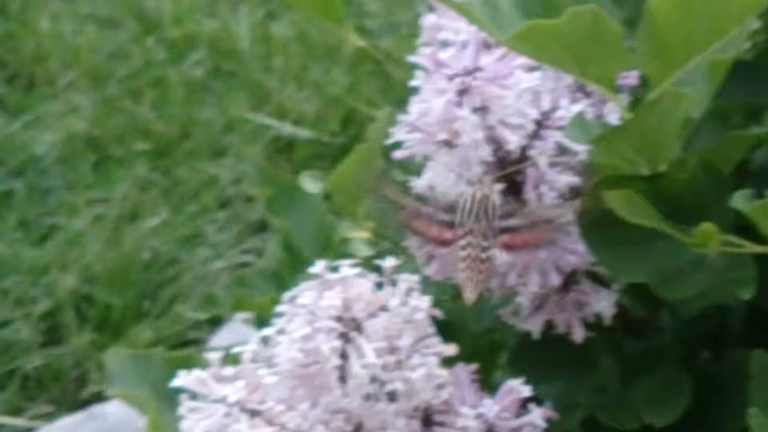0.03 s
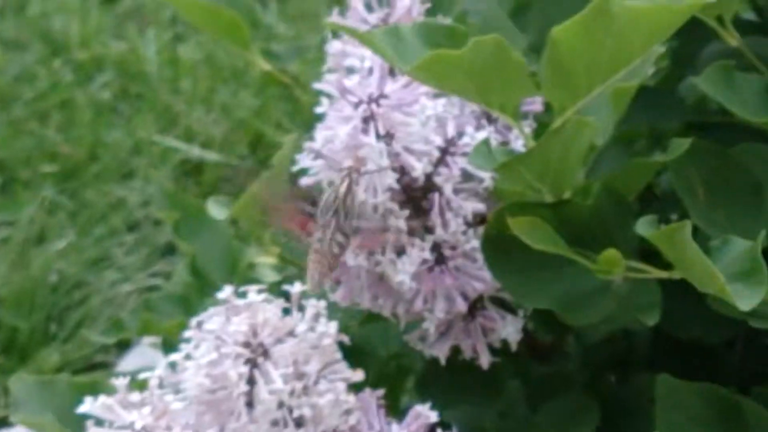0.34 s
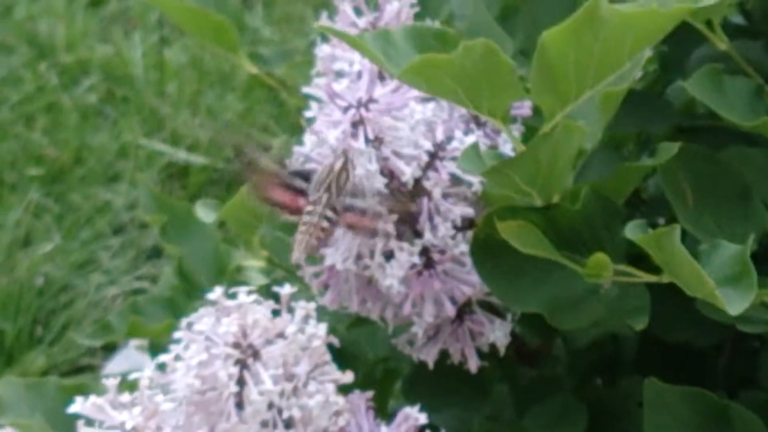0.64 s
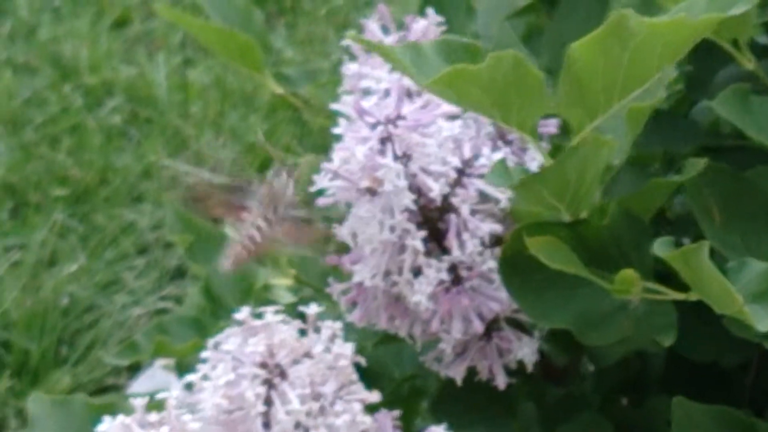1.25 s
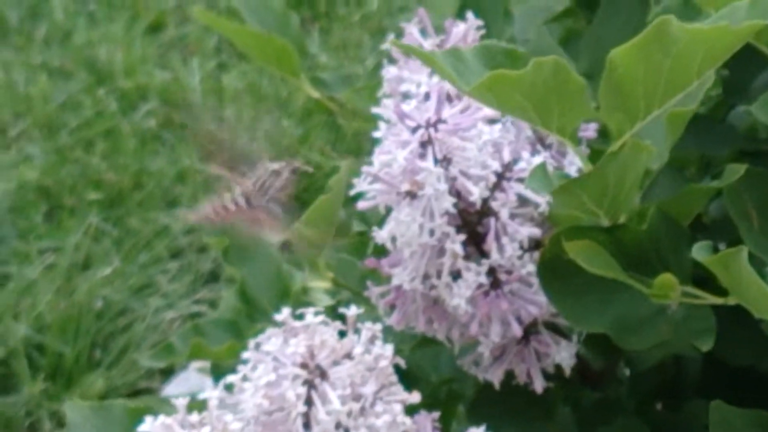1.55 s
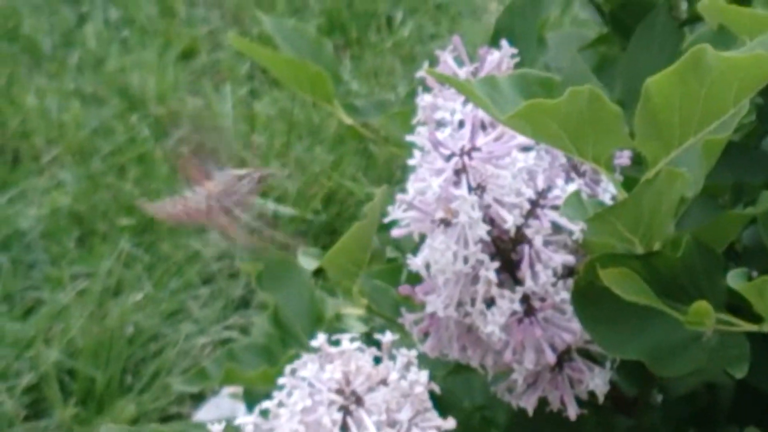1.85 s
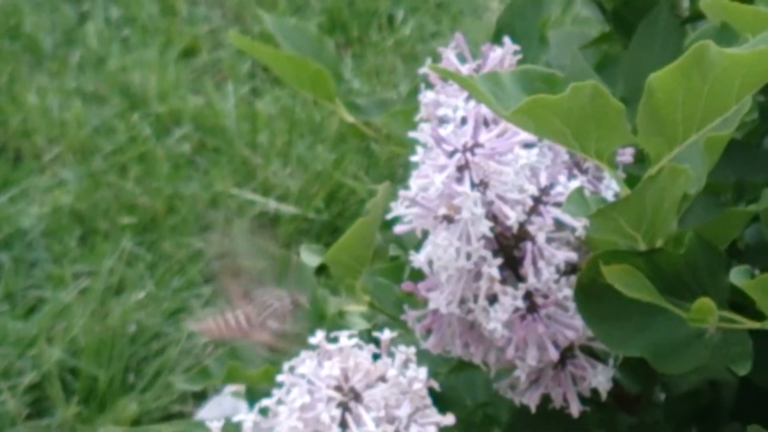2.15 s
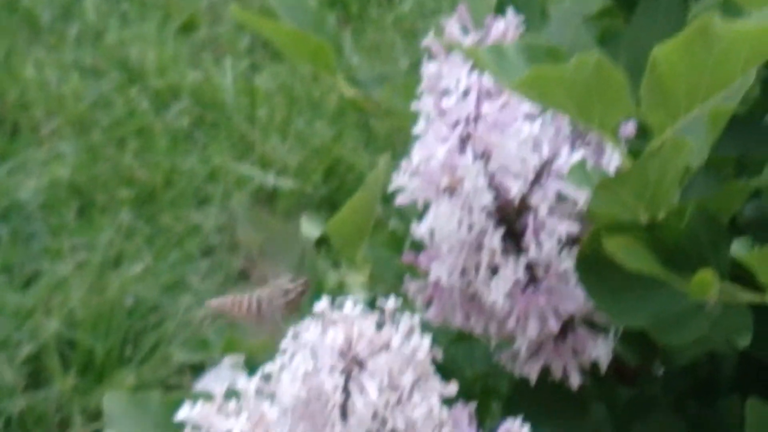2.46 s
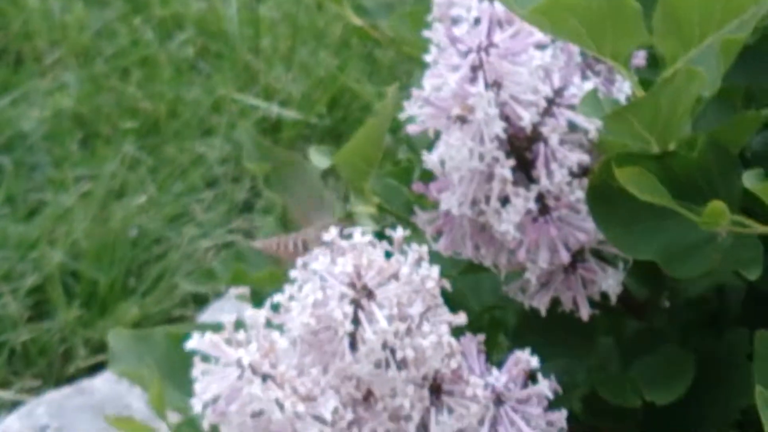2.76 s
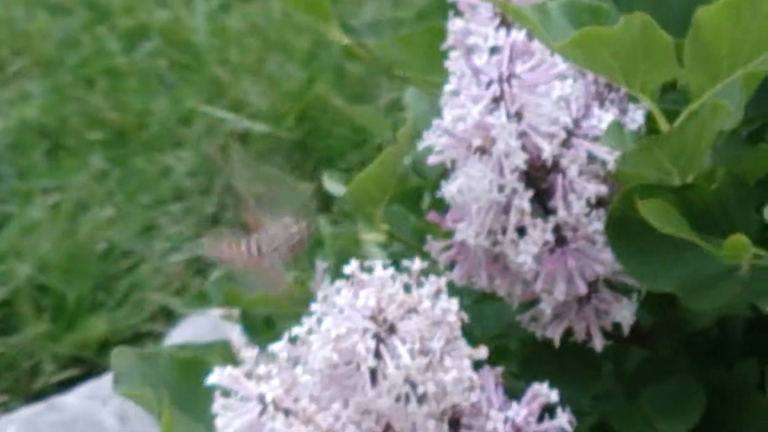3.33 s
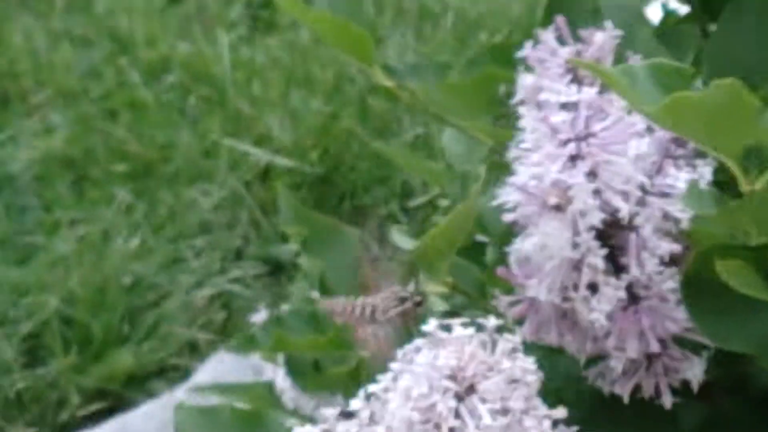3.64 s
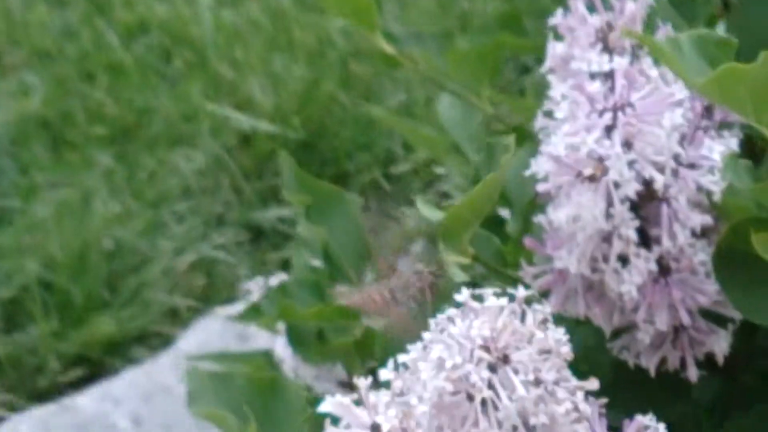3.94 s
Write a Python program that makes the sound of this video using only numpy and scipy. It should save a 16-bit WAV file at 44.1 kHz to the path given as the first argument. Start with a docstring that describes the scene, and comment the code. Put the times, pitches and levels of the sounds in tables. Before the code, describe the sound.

A distant engine idles low and steady outdoors, with a wash of traffic behind it. Early on a faint bird pips and whistles downward; later come small handling ticks and two low bumps close to the microphone.

```python
"""A big engine idles some way off to the right of a garden, its uneven firing giving low tones and rumble, and
its fan a broad wash of noise; a bird gives a few pips and one falling whistle, echoed by a wall. The
microphones are on a hand-held camera that starts a moment in. They hiss faintly and catch a puff of air; close
up, the housing ticks under the fingers and is bumped twice."""
import sys
import numpy as np
from scipy import signal
from scipy.fft import rfft, irfft, next_fast_len
from scipy.io import wavfile
from scipy.ndimage import uniform_filter1d, map_coordinates

SR = 44100
rng = np.random.default_rng(int(sys.argv[2]) if len(sys.argv) > 2 else 0)


def generate_wav(signal):
    """Clip the signal to [-1, 1] and save it as 16-bit WAV at the path in sys.argv[1]."""
    frames = np.transpose(np.atleast_2d(signal))
    scaled = np.clip(frames, -1, 1) * 32767
    pcm = np.round(scaled).astype(np.int16)
    wavfile.write(sys.argv[1], SR, pcm)


N = 176400


def amp(db):
    """Decibels to gain."""
    return 10 ** (np.asarray(db) / 20)


def unit(x):
    """Scale to rms 1."""
    return x / np.sqrt(np.mean(x ** 2) + 1e-20)


def clock():
    """Time of each sample in seconds."""
    return np.arange(N) / SR


def along(points, hz):
    """Read (frequency, value) points at hz, on a log frequency axis."""
    freqs, values = np.transpose(points)
    return np.interp(np.log(hz + 1), np.log(freqs + 1), values)


def curves(rows):
    """One value per sample for each column after the time."""
    times, *columns = np.transpose(rows)
    return [np.interp(clock(), times, column) for column in columns]


def wobble(rate):
    """A smooth random curve, rate knots a second."""
    return map_coordinates(rng.standard_normal(int(N * rate / SR) + 4), [clock() * rate])


def dying(start, t60):
    """A decay that begins at start and falls 60 dB in t60 seconds."""
    age = clock() - start
    return (age >= 0) * np.exp(-np.log(1000) * np.abs(age) / t60)


def filtered(x, response):
    """Filter x by a gain given as a function of frequency."""
    size = next_fast_len(N + SR // 2)
    return irfft(rfft(x, size) * response(np.fft.rfftfreq(size, 1 / SR)), size)[..., :N]


def noise(spectrum, correlation=np.zeros_like):
    """Coloured stereo noise of rms 1; the left-right correlation is a function of frequency."""
    def mid_side_gains(hz):
        angle = np.arccos(np.clip(correlation(hz), -1, 1)) / 2
        return amp(along(spectrum, hz)) * [np.cos(angle), np.sin(angle)]
    mid, side = filtered(rng.standard_normal((2, N)), mid_side_gains)
    return unit(np.array([mid + side, mid - side]))


def patchy(x, depth_db):
    """Let small regions of time and pitch swell and fade at random."""
    spectra = signal.stft(x, nperseg=1024)[2]
    patches = uniform_filter1d(rng.standard_normal(spectra.shape[1:]), size=5, axis=0)
    patches = uniform_filter1d(patches, size=7, axis=1)
    return signal.istft(spectra * amp(depth_db * unit(patches)), nperseg=1024)[1][:, :N]


def pan(db):
    """Left and right gains for a level difference, left minus right."""
    return amp(np.array([[.5], [-.5]]) * db)


def microphone_hiss():
    """The microphones' own faint noise, independent on each side."""
    # hiss spectrum (frequency [Hz], relative density [dB])
    spectrum = [(2000, -12.5), (4500, -3.5), (6300, -3.5), (8000, 1.5), (9500, -4), (12000, -11),
                (15500, -12)]
    # hiss loudness (time [s], level [dB])
    levels = [(.4, -75), (1.3, -73), (1.8, -72.5), (1.97, -71.5), (2.2, -72), (2.7, -72.5), (3.2, -72),
              (3.45, -71), (4, -72)]
    return pan(.8) * amp(curves(levels)[0]) * noise(spectrum)


def fan_wash():
    """Noise from the engine's fan, mostly to the right, drifting in patches."""
    # fan wash spectrum (frequency [Hz], relative density [dB])
    spectrum = [(150, -34), (250, -4), (326, -6.5), (400, -5.5), (490, -6), (660, -5), (770, -2.5),
                (860, -2), (980, -3), (1100, -1), (1230, -6.5), (1500, -10), (1950, -16), (2600, -16.5),
                (3170, -21), (6000, -30.5), (7800, -65)]
    # fan wash loudness (time [s], level [dB])
    levels = [(.4, -55.5), (1.05, -53.5), (1.45, -54.5), (1.6, -53.5), (1.64, -57.5), (1.78, -58),
              (2.0, -56.5), (2.2, -57.5), (2.6, -57.5), (3.0, -57), (3.5, -56.8), (3.95, -55)]
    # balance at the microphones (frequency [Hz], left minus right [dB])
    balance = [(60, -2), (99, 5), (160, 8), (270, 1.5), (450, -5.5), (740, -3), (1220, -7), (2010, -6),
               (3330, -1), (5500, -6.5), (9080, -5), (15000, -1.0)]
    # likeness of the two sides (frequency [Hz], correlation [-1 to 1])
    correlation = [(250, 0.91), (500, 0.82), (900, 0.51), (1300, -0.13), (2500, -0.083), (6000, -0.16)]
    wash = noise(spectrum, lambda hz: along(correlation, hz))
    wash = unit(filtered(wash, lambda hz: pan(along(balance, hz))))
    level_db = curves(levels)[0] + .42 * wobble(14)
    return amp(level_db) * patchy(wash, depth_db=1.32)


def bright_rush():
    """A faint rush, brighter than the fan's wash, that stops abruptly."""
    # rush spectrum (frequency [Hz], relative density [dB])
    spectrum = [(900, -34), (1800, -7), (2800, -5), (4500, -9), (7000, -13), (12000, -25)]
    stop_s, fade_s = 1.64, .054
    fade = np.clip((stop_s - clock()) / fade_s, 0, 1)
    return pan(-.38) * amp(-72) * fade * noise(spectrum)


def air_puff():
    """A light puff of air on the microphones: one swell of very low buffeting."""
    # buffeting spectrum (frequency [Hz], relative density [dB])
    spectrum = [(1, -15), (4, 6.5), (8, -6), (20, -17), (60, -26), (150, -49), (400, -60), (1500, -120)]
    peak_s, width_s = 1.17, .19
    swell = np.exp(-((clock() - peak_s) / width_s) ** 2)
    return amp(-43) * swell * noise(spectrum)


def finger_ticks():
    """Fingers draw tiny cracks from the plastic housing by the microphones, each with a short ring."""
    # ticks (time [s], level [dB], ring against crack before its trim [dB])
    ticks = [(2.8896, -62, -10), (2.9268, -60, -10), (3.002, -54, -3), (3.0744, -56, -8), (3.079, -63, -6),
             (3.1279, -56, -1), (3.6512, -57.5, -12), (3.6874, -61, -6), (3.838, -61, -7),
             (3.952, -57.5, -13)]
    # crack spectrum (frequency [Hz], relative density [dB])
    spectrum = [(1500, -16), (4000, -3), (6000, 1), (8000, 7), (11000, -4.5), (15000, -10.5)]
    ring_hz, half_width_hz, ring_trim_db = 3900, 750, -1.5
    crack = noise(spectrum)
    white = rng.standard_normal((2, N))
    ring = unit(filtered(white, lambda hz: 1 / (1 + ((hz - ring_hz) / half_width_hz) ** 2)))
    out = np.zeros((2, N))
    for start, db, ring_db in ticks:
        ringing = amp(ring_db + ring_trim_db) * ring * dying(start, t60=.035)
        out += amp(db) * (crack * dying(start, t60=.018) + ringing)
    return out


def camera_bumps():
    """A soft knock, then the camera body sways and quickly settles."""
    # bumps (time [s], sway rate [Hz], sway gain [dB], knock peak [dB], left minus right [dB])
    bumps = [(3.5263, 86, -30.5, -76, 6.5), (3.9818, 80, -25, -31, 18.5)]
    sway_rise_s, knock_lead_s, knock_width_s = .0012, .0008, .0005
    out = np.zeros((2, N))
    for start, hz, sway_db, knock_db, pan_db in bumps:
        age = clock() - start
        onset = 1 - np.exp(-np.abs(age) / sway_rise_s)
        sway = -amp(sway_db) * np.sin(2 * np.pi * hz * age) * onset * dying(start, t60=.053)
        knock = amp(knock_db) * np.exp(-((age + knock_lead_s) / knock_width_s) ** 2)
        out += pan(pan_db) * (sway + knock)
    return out


def bird_tone(hz, rough_rad):
    """A nearly pure tone, roughened by flutter in phase and level."""
    phase = 2 * np.pi * np.cumsum(hz) / SR + rough_rad * wobble(350)
    return np.sqrt(2) * np.sin(phase) * amp(2.5 * wobble(90))


def bird():
    """One falling whistle and a few short gliding pips."""
    # falling whistle (time [s], pitch [Hz], level [dB])
    whistle = [(.555, 4060, -75), (.58, 4020, -61.5), (.625, 3860, -62), (.66, 3560, -61.5),
               (.715, 3150, -59.5), (.752, 2480, -61), (.78, 2330, -70)]
    # pips (start [s], length [s], first pitch [Hz], last pitch [Hz], level [dB])
    pips = [(.402, .04, 3120, 3080, -65), (.43, .02, 3800, 3900, -69), (.462, .032, 3270, 3220, -62.5),
            (.858, .04, 3000, 2450, -66), (2.62, .05, 2500, 2650, -75), (3.085, .045, 2350, 2600, -69),
            (3.715, .06, 2400, 2250, -71)]
    t = clock()
    whistle_hz, whistle_db = curves(whistle)
    whistling = (t > whistle[0][0]) * (t < whistle[-1][0])
    song = bird_tone(whistle_hz, rough_rad=.35) * amp(whistle_db) * whistling
    for start, length, first_hz, last_hz, db in pips:
        progress = np.clip((t - start) / length, 0, 1)
        hz = first_hz + (last_hz - first_hz) * progress
        song += amp(db) * np.sin(np.pi * progress) * bird_tone(hz, rough_rad=.6)
    return song


def garden(song):
    """The song reaches the microphones directly, off a wall and as the garden's scatter."""
    echo_s, echo_db, scatter_db = .145, -16, -7
    tail = rng.standard_normal((2, N)) * dying(0, t60=.6)
    scatter = signal.fftconvolve(song[None], tail / np.linalg.norm(tail[0]), axes=1)[:, :N]
    direct = np.array([song, np.roll(song, shift=2)])  # reaches the left microphone first
    echo = np.roll(direct, round(echo_s * SR), axis=1)
    return direct + amp(echo_db) * echo + amp(scatter_db) * scatter


def engine():
    """Some way off to the right, uneven firing gives tones on multiples of the cycle rate, over a rumble."""
    # idle speed (time [s], four-stroke cycle rate [Hz])
    speed = [(.42, 6.76), (.8, 6.79), (1.2, 6.87), (1.85, 6.83), (2.3, 6.96), (2.5, 6.92), (2.95, 6.62),
             (3.4, 6.58), (3.95, 6.6)]
    # swell of the whole engine (time [s], gain [dB])
    effort = [(.4, 0), (.9, 0), (1.15, 1), (1.45, 1.5), (1.8, -1.5), (2.2, -1), (2.5, -3), (2.95, 0),
              (3.3, -1), (3.9, 1)]
    # exhaust tones (multiple of the cycle rate, rms before the swell [dB], left minus right [dB])
    exhaust = [(4, -55, -8.5), (8, -57.5, -2), (11, -57, -1.5), (13, -63.5, -6), (15, -59, -8),
               (16, -54, -3), (20, -75, -1), (27, -65.5, 1), (28, -66.5, -3), (32, -72.5, -5.5),
               (36, -77.5, -1.5), (38, -71, -5)]
    # rumble spectrum (frequency [Hz], relative density [dB])
    rumble = [(10, 1), (25, -17.5), (45, 5), (80, 0), (115, 2.5), (140, 1), (200, -5.5), (260, -11.5),
              (330, -20.5), (450, -61)]
    waver_db, spread_rad, drift_rad = 1.33, .19, .073
    cycle_phase = 2 * np.pi * np.cumsum(curves(speed)[0]) / SR
    out = pan(-7) * amp(-56.5) * noise(rumble, correlation=np.ones_like)
    for multiple, db, pan_db in exhaust:
        offset = rng.uniform(0, 2 * np.pi) + spread_rad * rng.standard_normal((2, 1))  # one per side
        phase = multiple * cycle_phase + offset + drift_rad * wobble(5)
        out += pan(pan_db) * np.sqrt(2) * amp(db + waver_db * wobble(5.9)) * np.sin(phase)
    return amp(curves(effort)[0]) * out


def scene():
    """The garden and the handling noise, together at the microphones."""
    hiss = microphone_hiss()
    outdoors = engine() + fan_wash() + bright_rush() + air_puff() + garden(bird())
    return hiss + outdoors + finger_ticks() + camera_bumps()


def record(dry):
    """Silence until the camera starts; nothing above its band limit."""
    start_s, top_hz = .3925, 15600
    return filtered(dry * (clock() >= start_s), lambda hz: hz < top_hz)


dry = scene()
out = record(dry)
generate_wav(out)
```